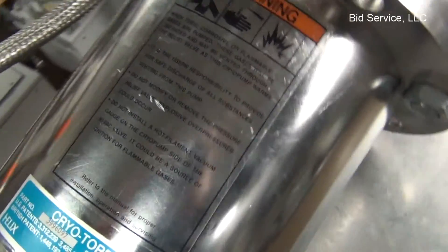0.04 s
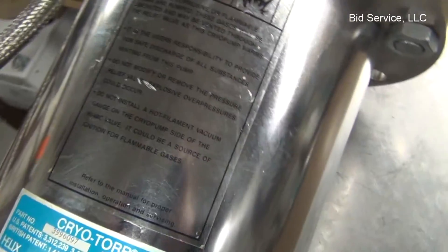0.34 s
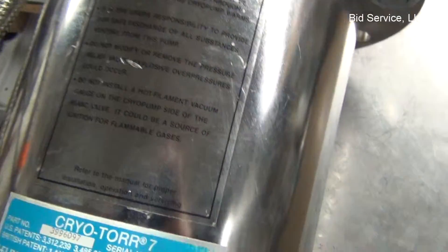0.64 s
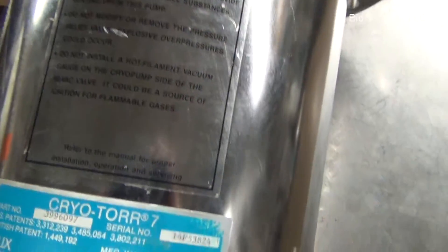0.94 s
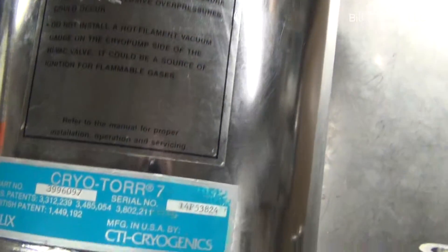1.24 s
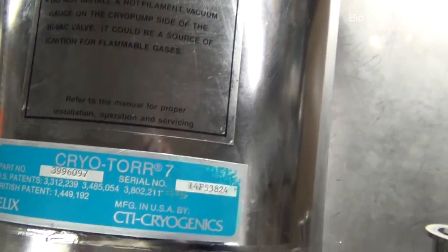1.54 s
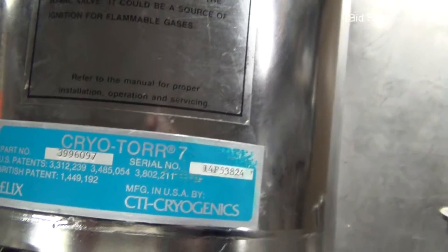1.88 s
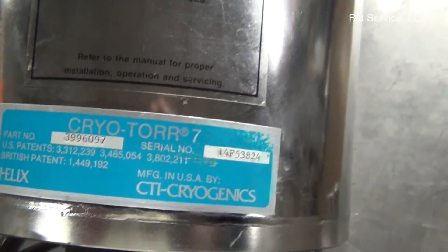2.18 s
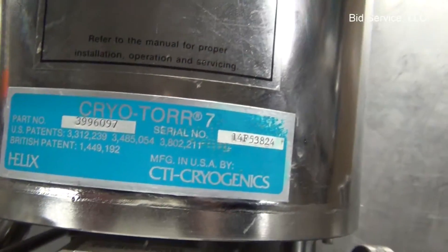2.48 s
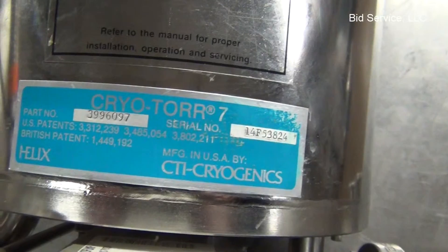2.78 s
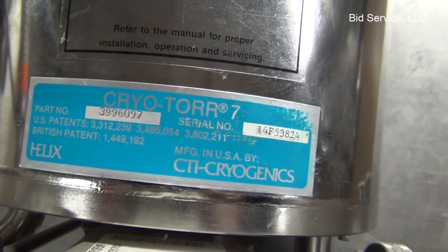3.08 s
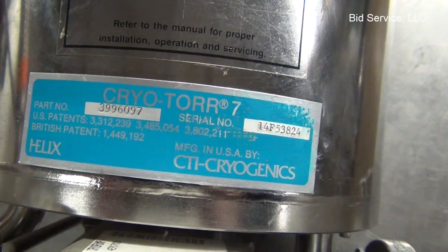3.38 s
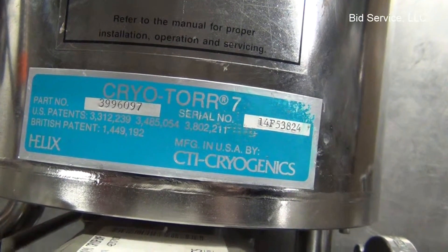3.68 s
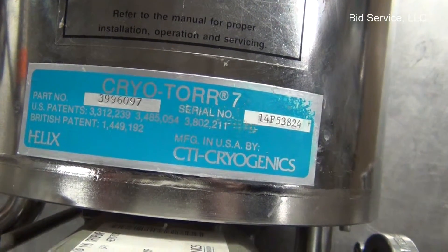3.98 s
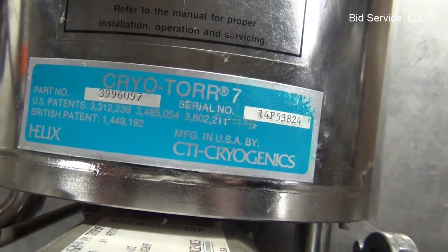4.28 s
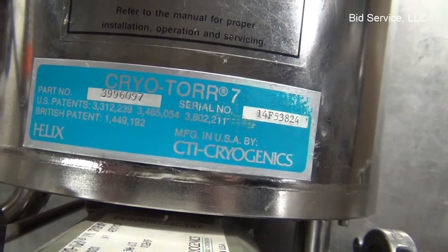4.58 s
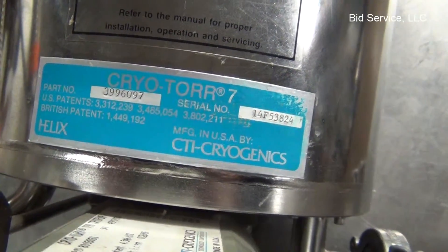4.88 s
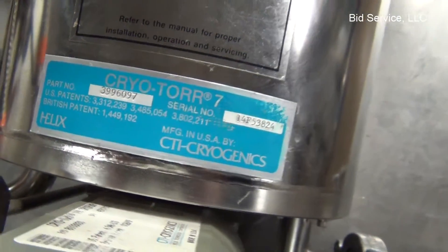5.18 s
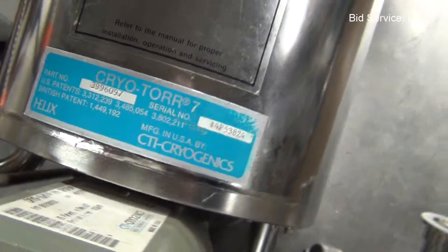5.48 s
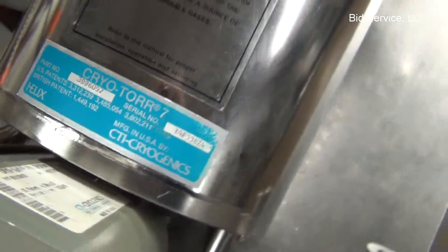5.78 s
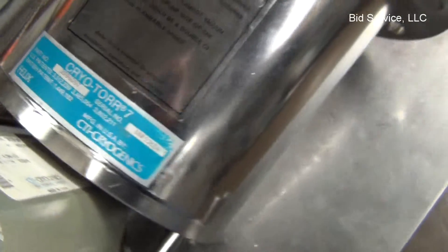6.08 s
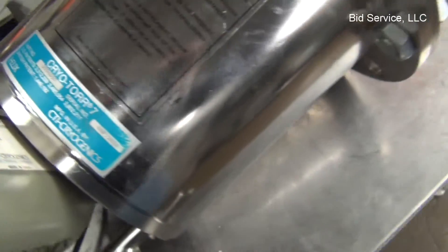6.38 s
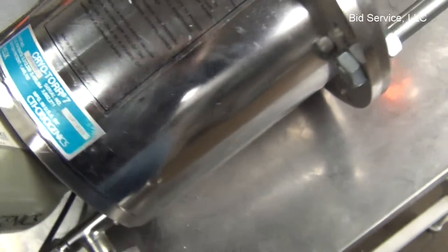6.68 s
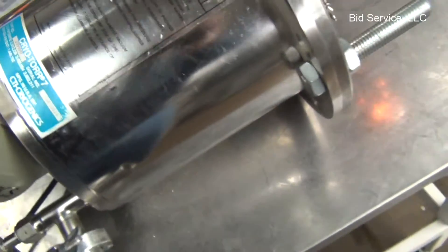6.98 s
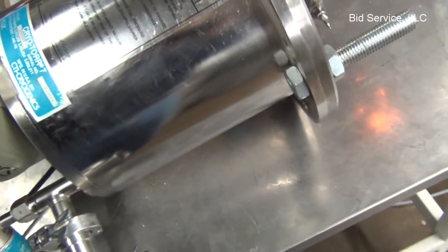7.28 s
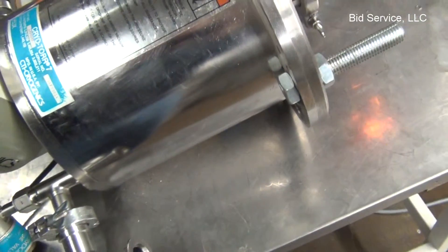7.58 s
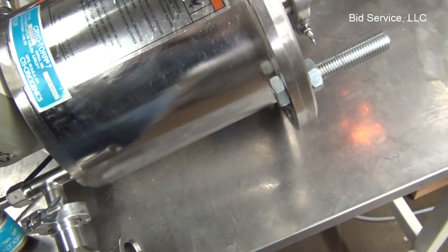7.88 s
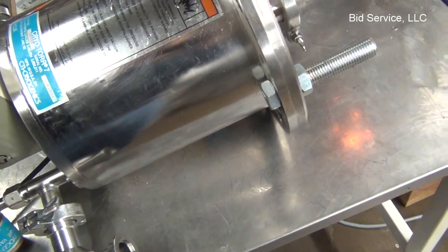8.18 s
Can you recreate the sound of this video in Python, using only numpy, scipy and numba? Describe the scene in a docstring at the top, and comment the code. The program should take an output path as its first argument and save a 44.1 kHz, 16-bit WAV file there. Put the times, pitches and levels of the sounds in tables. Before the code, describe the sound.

Steady mechanical hum and high hiss from a running pump, with even metallic ticks, knocks and short puffs of gas.

```python
"""A cryogenic vacuum pump runs on a workshop bench, heard from close by.
From the start its helium compressor hums, throbs and spits once a shaft turn; a motor and fan drone.
Every 0.3 s the cold head vents, knocks, ticks, refills and knocks again, ringing its steel housing;
a limiter ducks the hum under each sharp tick. In the first second the microphone moves from flank to
front; it is nearest the cold head at 3.3 s and returns to the flank after 5.3 s as the strokes recede."""
import sys
import numpy as np
from scipy import signal
from scipy.fft import rfft, irfft
from scipy.io import wavfile
from scipy.ndimage import uniform_filter1d, map_coordinates
from numba import njit

SR = 44100
rng = np.random.default_rng(int(sys.argv[2]) if len(sys.argv) > 2 else 0)


def store_pcm(level_fs):
    """Save levels as 16-bit WAV."""
    pcm = np.round(np.clip(level_fs, -1, 1) * 32767).astype(np.int16)
    wavfile.write(sys.argv[1], SR, np.atleast_2d(pcm).T)


N = 367794

STROKE_S, FIRST_TICK_S = 0.3, 0.1257
SHAFT_HZ, MOTOR_HZ, MAINS_HZ = 56.39, 58.63, 60
# parts of a stroke: level_db, share_of_nearness, scatter_db
TICK = (-18, 0.95, 0.81)
EXHAUST = (-31.5, 0.89, 1.8)
INLET = (-35.5, 0.9, 2.2)
KNOCK = (-27.5, 0.48, 1)
RING = (-38.5, 0.1, 2)

# modes of the cold head: pitch_hz, width_hz, exhaust_db, inlet_db, tick_db
HEAD_MODES = [(1670, 380, 5, 14, 9.5), (3400, 1400, 2, 11, -6), (6204, 203, 20.5, 32, 15.5),
              (7090, 350, 16.5, 25, 20), (7670, 490, 15.5, 29.5, 23), (8090, 320, 22, 34.5, 22.5),
              (9500, 145, 18.5, 25, 8), (10490, 41, 23.5, 31, 12), (11540, 680, 5.5, 12.5, -18),
              (14000, 450, 1, 11, -19)]
# modes of the displacer's housing: pitch_hz, width_hz, knock_db, clack_db
HOUSING_MODES = [(580, 370, 44, 23), (1020, 180, 46.5, 47.5), (1294, 150, 41.5, 50.5), (1496, 59, 31, 52),
                 (1833, 150, 45, 51), (2540, 95, 39.5, 33), (3270, 250, 36, 40.5)]
# ticks that sound louder: start_s, extra_db
TICK_ACCENTS = [(1.326, 3), (1.926, 2), (2.226, 4), (4.326, 4.5), (7.626, 10), (7.926, 7)]
# strokes on which the can sings out: start_s, extra_db
RING_ACCENTS = [(0.731, 4.5), (1.031, 8.5), (1.239, 6), (1.539, 6), (1.839, 7), (5.739, 8.5), (6.731, 8),
                (6.939, 6), (8.231, 5)]
# partials of the compressor hum: shaft_multiple, level_db
SHAFT_ORDERS = [(1, -55.5), (2, -47.5), (3, -35), (4, -23), (4.5, -35), (5, -24.5), (6, -37.5), (7, -40.5),
                (7.5, -44.5), (8, -45), (9, -41), (11, -44), (12, -36.5), (14, -47), (15, -40.5),
                (16, -39.5), (16.5, -48), (17, -52.5), (18, -66), (19, -47)]
# tones of the fan and a motor, with one side tone of the compressor's throb: pitch_hz, level_db
DRONE_TONES = [(58.6, -54), (103.8, -38), (117.2, -48), (175.9, -41), (207.6, -27.5), (218.4, -38.5),
               (311.5, -37), (351.9, -47), (726.9, -45.5), (1078.6, -49)]
# spectrum of gas rushing in the lines: frequency_hz, density_db
GAS_SPECTRUM = [(1000, -76.5), (4000, -80.5), (5700, -80), (6300, -70.5), (7000, -68), (7700, -64.5),
                (8300, -61), (8800, -67), (9450, -73.5), (10000, -72), (11500, -82), (15500, -90)]
# modes of the gas lines: pitch_hz, width_hz, front_db, flank_db
PIPE_MODES = [(2430, 130, -25, -30), (3310, 380, -24, -18.5), (3415, 200, -22, -25.5),
              (4460, 580, -22, -25.5), (6260, 113, -17.5, -46), (6690, 160, -19, -24.5),
              (7650, 255, -14.5, -21.5), (8150, 310, -31, -18.5), (9300, 280, -27, -22),
              (9200, 100, -26, -36), (11300, 300, -46, -31), (12400, 500, -52, -34.5),
              (13300, 180, -49, -40)]
# spectrum of casing and air rumble: frequency_hz, density_db
RUMBLE_SPECTRUM = [(25, -95), (60, -71), (100, -63.5), (160, -54), (225, -45.5), (300, -54), (420, -54.5),
                   (680, -56), (900, -59), (1200, -62), (2000, -64.5), (3300, -66), (5600, -75),
                   (15000, -90)]
# level at the left microphone port minus the right: frequency_hz, front_db, flank_db
PORT_BALANCE = [(40, -4.5, -6), (95, -11, -14), (200, -5.4, -8), (760, -4, -7.5), (1360, -1, -4),
                (2500, 0, -5.5), (4400, -1.8, -5.5), (6500, -.8, -2.5), (9000, -1.5, 3),
                (11500, -0.3, -0.5)]
# reflections that differ between the ports: frequency_hz, gain_db
DIFFUSE_SPECTRUM = [(30, -12), (60, -20), (130, -30), (300, -28), (700, -18), (1400, -26), (2500, -37),
                    (4500, -20), (6200, -9), (8600, -10), (10500, -14), (11800, -38), (15000, -40)]
# path of the microphone round the pump (0 in front, 1 at the flank): time_s, flank_share
MIC_PATH = [(0, 0.84), (1, 0.082), (4, 0.03), (5.3, 0.053), (6.3, 0.83), (7.3, 0.94), (8.34, 0.93)]
# nearness of the cold head to the microphone: time_s, gain_db
HEAD_NEARNESS = [(0, -10), (1, -4.5), (1.7, -2), (3.3, 1), (5.2, -1.5), (6.2, -8), (7.5, -13), (8.34, -16)]
# rise and fall of the hum at the microphone: time_s, gain_db
HUM_GAIN = [(0, -1.5), (1, 1.5), (4, 1), (6.3, -.5), (8.34, -3)]
# rise and fall of the gas hiss at the microphone: time_s, gain_db
GAS_GAIN = [(0, 0.5), (1, 1.5), (4, -1.5), (5.3, 0.5), (8.34, -.5)]


def cold_head(ticks, exhaust_lead_s=0.1035, inlet_lag_s=0.036, grain_db=2, rebound_s=0.015):
    """Modal excitation: exhaust hiss, a rebounding tick and inlet hiss drive the same steel modes."""
    tick_s, tick_db = ticks
    exhaust = bursts(*strokes(EXHAUST, -exhaust_lead_s), opening(0.038, 0.56))
    inlet = bursts(*strokes(INLET, inlet_lag_s), opening(0.061, 1.0))
    tick = bursts(tick_s, tick_db, decay(0.0061))
    rebound = bursts(tick_s + rebound_s, tick_db - 15, decay(.002))
    envelopes = exhaust * undb(grain_db * walk(300)), inlet * undb(grain_db * walk(300)), tick + rebound
    return sum(resonate(envelope * rng.standard_normal(N), HEAD_MODES, k)
               for k, envelope in enumerate(envelopes))


def displacer(ticks, lead_s=.085, seat_lag_s=.062, bounce_s=.0068, clack_lead_s=0.001475):
    """Impacts ring the housing: a knock and bounce at each end of travel, a valve clack at each tick."""
    tick_s, tick_db = ticks
    up_s, up_db = strokes(KNOCK, -lead_s)
    down_s, down_db = strokes(KNOCK, seat_lag_s)
    ends_s, ends_db = np.r_[up_s, down_s], np.r_[up_db, down_db - 5]
    knocks = strikes(ends_s, ends_db) + strikes(ends_s + bounce_s, ends_db - 3)
    clacks = strikes(tick_s - clack_lead_s, 0.34 * tick_db - 24)
    return resonate(knocks, HOUSING_MODES, 0) + resonate(clacks, HOUSING_MODES, 1)


def strikes(times, dbs, click_db=-4, chatter_gain=.1, jitter_s=.0007):
    """Contact force of oiled parts: an impulse and brief chatter, never quite on time."""
    clicks = bursts(times + jitter_s * rng.standard_normal(len(times)), dbs, np.ones(1))
    chatter = signal.fftconvolve(clicks, decay(0.0021))[:N] * rng.standard_normal(N)
    return undb(click_db) * clicks + chatter_gain * chatter


def steel_can(pitch_hz=1501, t60_s=0.19, swell_s=0.0069, up_lead_s=.087, down_lag_s=0.0056):
    """Damped vibration: one mode of the can swells and dies unevenly on each up and down stroke."""
    age = np.arange(SR // 3) / SR
    envelope = (1 - np.exp(-age / swell_s)) * undb(-60 * age / t60_s)
    ring = 2 * undb(2.5) * envelope / envelope.max() * np.sin(2 * np.pi * pitch_hz * age)
    rings = sum(bursts(*strokes(RING, lag, RING_ACCENTS), ring) for lag in (-up_lead_s, down_lag_s))
    return rings * undb(walk(120))  # about 1 dB of judder


def strokes(part, lag_s, accents=()):
    """Periodic drive: times and dB of one part of every stroke, louder nearby and a little uneven."""
    db, share, scatter_db = part
    times = np.arange(FIRST_TICK_S, N / SR, STROKE_S) + lag_s
    extra_db = sum(more * (np.abs(times - when) < STROKE_S / 10) for when, more in accents)
    uneven_db = scatter_db * rng.standard_normal(len(times))
    return times, db + share * at(HEAD_NEARNESS, times) + uneven_db + extra_db


def compressor(throb_per_order=0.026):
    """Beating: the rotor slips behind the mains, so its partials throb at twice the slip frequency."""
    beat_cycles = 2 * (MAINS_HZ - SHAFT_HZ) * clock()
    hum = 0
    for order, db in SHAFT_ORDERS:
        depth = min(throb_per_order * order, .8)
        beat = 1 + depth * np.cos(2 * np.pi * (beat_cycles + rng.random()))
        hum = hum + beat * tone(order * SHAFT_HZ, db, waver=0.18, waver_hz=1.531)
    return hum


def drone(buzz_db=-46):
    """Rotational sound: fan and motor tones and a compressor sideband waver; a buzz repeats each turn."""
    one_turn = rng.standard_normal(int(SR / MOTOR_HZ))
    drive = map_coordinates(one_turn, [clock() * MOTOR_HZ % 1 * len(one_turn)], mode="grid-wrap")
    panel = [(4250, 570, 5.0), (5460, 600, 2.0)]
    buzz = unit(resonate(resonate(drive, panel), panel))
    return sum(tone(hz, db, waver=0.19, waver_hz=3.46) for hz, db in DRONE_TONES) + undb(buzz_db) * buzz


def gas_lines(flank, surge=0.69, decay_turns=0.2):
    """Flow noise surges after each discharge; the pipe modes radiate differently to front and flank."""
    age_turns = (SHAFT_HZ * clock() + 2 / 3) % 1
    flow = unit(uniform_filter1d(1 + surge * np.exp(-age_turns / decay_turns), size=24))
    front, side = (resonate(flow * rng.standard_normal(N), PIPE_MODES, k) for k in range(2))
    return noise(GAS_SPECTRUM) * flow + np.sqrt(1 - flank) * front + np.sqrt(flank) * side


def discharge_valve(flank, db=-35, flank_db=-3.2, decay_turns=0.16, scatter_db=1.5):
    """Pulsed flow: one puff each shaft turn excites the valve's broad, high resonance."""
    turns = SHAFT_HZ * clock() + 2 / 3
    size = undb(scatter_db * rng.standard_normal(int(turns[-1]) + 1))[turns.astype(int)]
    puffs = size * np.exp(-(turns % 1) / decay_turns) * rng.standard_normal(N)
    mode = [(8850, 1400, 0)]
    return undb(db + flank_db * flank) * unit(resonate(resonate(puffs, mode), mode))


def seals(db=-31.5):
    """Sliding friction: the displacer's seals stir the housing's lower modes, heard only close by."""
    modes = [(912, 59, 1), (1085, 45, 1.0), (1330, 330, -7.5), (1645, 170, -5.5)]
    return undb(db + at(HEAD_NEARNESS, clock())) * unit(resonate(rng.standard_normal(N), modes))


def casing_rumble(flicker_db=0.92, depth=0.15):
    """Amplitude modulation: casing noise swells a little with each shaft turn."""
    swell = 1 + depth * np.cos(2 * np.pi * SHAFT_HZ * clock())
    return noise(RUMBLE_SPECTRUM) * swell * undb(flicker_db * walk(25))


def port_air(db=-57, top_hz=45):
    """Uncorrelated noise: air stirs at each microphone port on its own, a faint, deep flutter."""
    lowpass = signal.butter(2, top_hz, "low", fs=SR, output="sos")
    return undb(db) * unit(signal.sosfilt(lowpass, rng.standard_normal((2, N))))


def beam(x, flank, loss=0.42, width_hz=320):
    """Directivity: the cold head valve's two whistles radiate forwards and fade towards the flank."""
    whistles = sum(resonate(x, [(hz, width_hz, 0)]) for hz in (6200, 10550))
    return x - loss * np.sqrt(flank) * whistles


def bench_echoes(x, flank, echo_gain=0.13, path_change=0.0966, lowest_hz=900):
    """Early reflection: nearby steel returns the treble by paths that change as the microphone moves."""
    treble = signal.sosfilt(signal.butter(2, lowest_hz, "high", fs=SR, output="sos"), x)
    for lag_s in (.0031, .0053, .0087, .0124):
        lag = lag_s * SR * (1 + path_change * rng.uniform(-0.966, 1) * flank)
        x = x + echo_gain * map_coordinates(treble, [np.arange(N) - lag], order=3)
    return x


def stereo_ports(mid, flank, room_s=0.011, shift_hz=1.3):
    """Decorrelation: short, shifting reflections differ between two close microphone ports."""
    echoes = rng.standard_normal((2, SR // 10)) * decay(room_s)
    one, other = (signal.fftconvolve(mid, echo / np.linalg.norm(echo))[:N] for echo in echoes)
    angle = 2 * np.pi * shift_hz * clock() + walk(1.995)
    diffuse = colour(np.cos(angle) * one + np.sin(angle) * other, undb(along(DIFFUSE_SPECTRUM)))
    side = pan(mid, flank) + diffuse
    return np.array([mid + side, mid - side])


def pan(x, flank):
    """Level difference between the ports: bass leans furthest right, and more so at the flank."""
    balance = np.array(PORT_BALANCE)
    # tanh turns a left-minus-right level into a side-to-mid ratio
    front, side = (colour(x, np.tanh(along(balance[:, [0, k]]) * np.log(10) / 40)) for k in (1, 2))
    return (1 - flank) * front + flank * side


def resonate(x, modes, column=0):
    """Superposition of (pitch_hz, width_hz, gain_db, ...) modes; neighbours move in opposite senses."""
    return sum((-1) ** k * undb(dbs[column]) * signal.lfilter(*signal.iirpeak(hz, hz / width, SR), x)
               for k, (hz, width, *dbs) in enumerate(modes))


def tone(hz, db, waver, waver_hz):
    """Random modulation: a sinusoid wavers in amplitude and phase."""
    carrier = np.exp(2j * np.pi * (hz * clock() + rng.random()))
    modulation = 1 + waver * (walk(waver_hz) + 1j * walk(waver_hz))
    return np.sqrt(2) * undb(db) * np.real(carrier * modulation)


def bursts(times, dbs, shape):
    """Convolution places one scaled copy of the shape at each time."""
    hits = np.zeros(N)
    hits[np.clip((times * SR).astype(int), 0, N - 1)] = undb(dbs)
    return signal.fftconvolve(hits, shape)[:N]


def decay(seconds):
    """Exponential decay with the given time constant."""
    return np.exp(-np.arange(SR // 10) / (SR * seconds))


def opening(seconds, ramp_share):
    """Flow envelope of a valve that opens and shuts."""
    return signal.windows.tukey(int(seconds * SR), ramp_share)


def walk(rate_hz):
    """Sample and hold: random levels, smoothed twice, with a spread near 1."""
    hold = int(SR / rate_hz)
    held = np.repeat(rng.standard_normal(N // hold + 2), hold)[rng.integers(hold):]
    return 1.74 * uniform_filter1d(uniform_filter1d(held, hold), hold)[:N]


def noise(spectrum):
    """White noise shaped to a (frequency_hz, density_db) spectrum."""
    return colour(rng.standard_normal(N) * np.sqrt(SR / 2), undb(along(spectrum)))


def colour(x, gain):
    """Linear filtering by a gain at every frequency."""
    return irfft(rfft(x) * gain, N)


def along(points):
    """A (frequency_hz, value) table read at every frequency, on a log axis."""
    hz, value = np.transpose(points)
    return np.interp(np.log(np.arange(N // 2 + 1) * SR / N + 1), np.log(hz), value)


def at(curve, times):
    """A (time_s, value) curve read at the given times."""
    return np.interp(times, *np.transpose(curve))


def undb(db):
    """Decibels to gain."""
    return 10 ** (np.asarray(db) / 20)


def unit(x):
    """Scale to an rms of 1."""
    return x / np.sqrt(np.mean(x ** 2))


def clock():
    """Time of every sample in seconds."""
    return np.arange(N) / SR


@njit
def follow(x, attack, release):
    """Envelope detection: a level that rises fast and sinks slowly."""
    out, level = np.empty(len(x)), 0.
    for i in range(len(x)):
        level += (x[i] - level) * (attack if x[i] > level else release)
        out[i] = level
    return out


def scene():
    """Superposition of strokes, hum and rush at a microphone that moves round the pump."""
    t = clock()
    flank, hum_db = at(MIC_PATH, t), at(HUM_GAIN, t)
    rush = seals() + undb(0.35 * hum_db - 0.22) * casing_rumble()  # rumble partly follows the hum
    rush += undb(at(GAS_GAIN, t)) * (gas_lines(flank) + discharge_valve(flank))
    hum = undb(hum_db) * (compressor() + drone())
    ticks = strokes(TICK, 0, TICK_ACCENTS)
    steady = hum + bench_echoes(rush, flank)
    pumping = beam(cold_head(ticks), flank) + displacer(ticks) + steel_can()
    return stereo_ports(pumping + steady, flank) + port_air()


def record(dry, threshold_db=-17, ratio=2.37, attack_s=0.00056, release_s=0.016, ahead_s=0.0011):
    """Compression: a look-ahead limiter follows mostly the treble; peaks are rounded, the top is cut."""
    mid = dry.mean(axis=0)
    treble = signal.sosfilt(signal.butter(2, 5000, "high", fs=SR, output="sos"), mid)
    level = follow(np.abs(treble) + 0.084 * np.abs(mid), 1 / (attack_s * SR), 1 / (release_s * SR))
    gain = np.minimum(1, undb(threshold_db) / (level + 1e-9)) ** (1 - 1 / ratio)
    early_gain = np.interp(clock() + ahead_s, clock(), uniform_filter1d(gain, size=128))
    limited = dry * early_gain
    rounded = limited / (1 + (limited / 1.6) ** 4)
    return signal.sosfilt(signal.ellip(10, .2, 80, 15500, fs=SR, output="sos"), rounded)


dry = scene()
out = record(dry)
store_pcm(out)
```